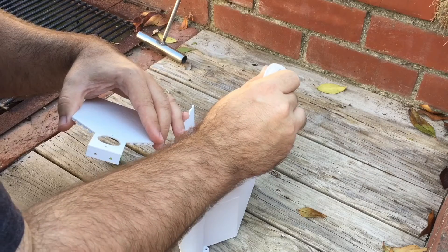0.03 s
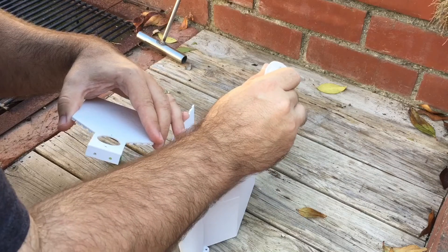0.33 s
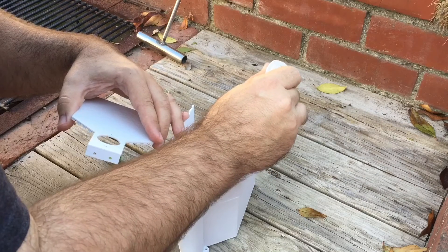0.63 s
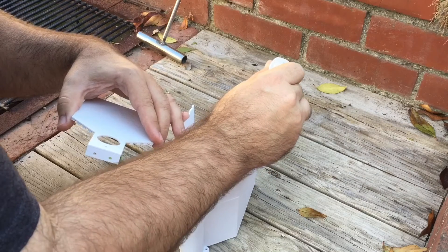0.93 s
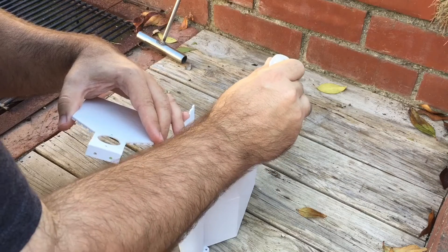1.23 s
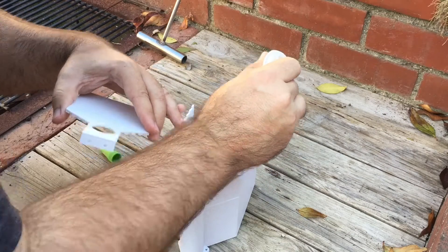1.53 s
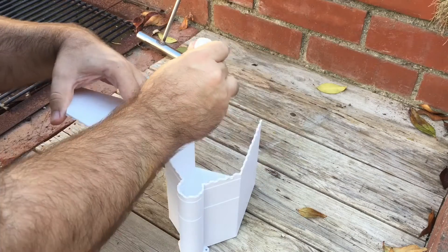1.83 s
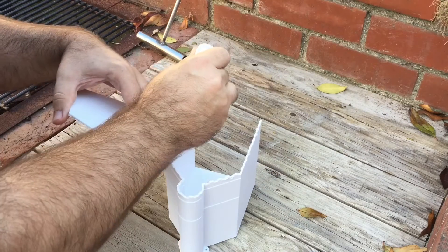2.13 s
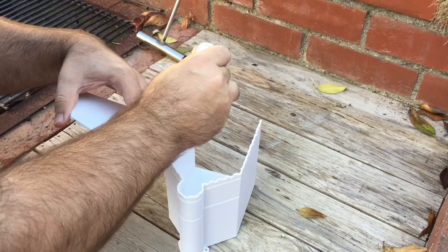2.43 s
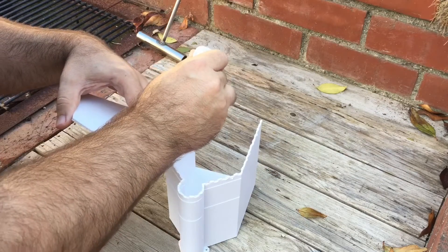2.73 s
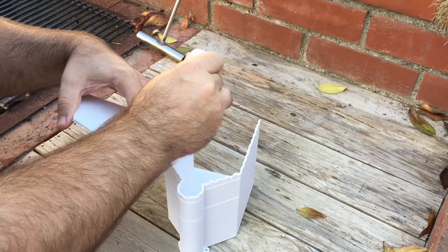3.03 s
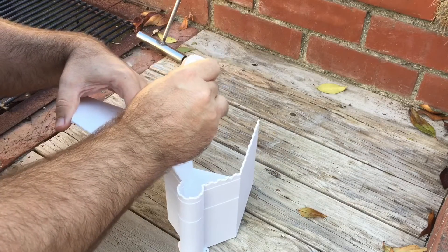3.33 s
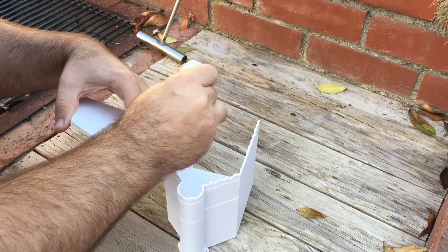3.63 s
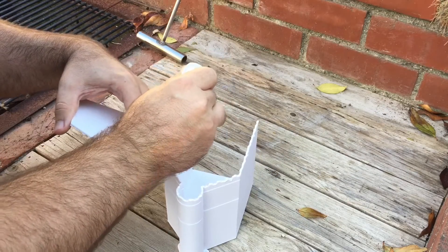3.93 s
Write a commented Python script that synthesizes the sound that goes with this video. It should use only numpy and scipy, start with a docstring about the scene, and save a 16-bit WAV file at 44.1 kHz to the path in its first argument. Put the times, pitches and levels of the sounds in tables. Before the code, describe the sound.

Plastic parts are screwed together by hand, close up, giving short hollow ticks. Then the shell knocks lightly on a wooden deck with low thuds and gritty rubbing. Outdoors, a machine hums and hisses steadily behind.

```python
"""Hands screw a plastic feeder together on a wooden deck outdoors. For a second and a half the tight
joint slips in short, hollow ticks, and the base rocks back between twists. Fingers swish over the
plastic; then, from about two seconds, the shell is shifted and knocks on the boards, with low thuds,
small edge clicks and light, gritty rubbing in between. Behind it all a machine, probably an air
conditioner, hums and hisses to the end."""
import sys
import numpy as np
from scipy import signal
from scipy.fft import rfft, irfft, next_fast_len
from scipy.io import wavfile
from scipy.ndimage import uniform_filter1d, map_coordinates

SR = 44100
rng = np.random.default_rng(int(sys.argv[2]) if len(sys.argv) > 2 else 0)


def log_audio(samples):
    """Write samples as a 16-bit WAV file to the path given in sys.argv[1]."""
    # one column per channel
    frames = np.atleast_2d(samples).T
    # limit to full scale, then quantise
    limited = np.clip(frames, -1, 1)
    pcm = np.round(limited * 32767).astype(np.int16)
    wavfile.write(sys.argv[1], SR, pcm)


N = 176400
T = np.arange(N) / SR
AGE = np.arange(SR // 4) / SR  # seconds into one hit
TOP_HZ = 15700
THUMP_ATTACK_S, SNAP_ATTACK_S = 0.0017, 0.0011

# Hollow body of the joint: pitch_ratio, gain_db, t60_s
JOINT_MODES = [(.38,-13,0.039),(.59,-36,0.058),(.86,-8.5,0.042),(1,10,0.021),(1.15,-5,0.017),(1.4,-19,0.038),(1.9,-38,0.043)]
# Woody thump of the boards, under slips and knocks: pitch_hz, gain_db, t60_s
BOARD_MODES = [(170,-6.5,0.085),(216.3,-1,0.16),(283.6,-6,0.3),(354.3,0,0.057),(400.2,-1.5,0.062),(517,-6.5,0.096),(652.4,-11,0.066),(767,-11.5,0.067),(855,-4,0.014)]
# Slip cues, before each layer's trim: start_s, tick_db, pitch_hz, thump_db, snap_db
SLIP_CUES = [(0.1681, -26, 1284, -34, -58), (0.249, -39, 1278, -55, -58), (0.2631, -25.5, 1316, -34.5, -59),
             (0.272, -39, 1180, -47, -68), (0.31, -48.5, 1270, -64, -72), (0.454, -42, 1230, -70, -77),
             (0.566, -22, 1302, -30.5, -54.5), (0.6679, -30.5, 1260, -44, -80),
             (0.8157, -29, 1274, -42.5, -60), (0.9362, -36.5, 1280, -39, -61),
             (0.9586, -43, 1300, -53, -70), (0.9909, -39, 1260, -52, -79), (1.1977, -29, 1300, -40.5, -52),
             (1.284, -29, 1302, -40, -59), (1.394, -21, 1326, -36, -45.5), (1.407, -30, 1340, -35, -51),
             (1.4745, -25.5, 1287, -37.5, -49)]
def slips(muffle_hz=3600):
    """The tight joint lets go in hollow ticks that nudge the boards; being enclosed muffles its snap."""
    out = np.zeros(N)
    for start_s, tick_db, pitch_hz, thump_db, snap_db in SLIP_CUES:
        tick = amp(tick_db + 2.5) * ring(JOINT_MODES, attack_s=0.0027, pitch=pitch_hz, sag=0.08)
        thump = amp(thump_db + 2) * ring(BOARD_MODES, THUMP_ATTACK_S)
        snap = amp(snap_db + 10.5) * filtered(wall_snap(), lambda hz: 1 / (1 + 1j * hz / muffle_hz))
        add(out, start_s, tick + thump + snap)
    return out


# Clack of the shell around its main ring: pitch_hz, gain_db, t60_s
SHELL_MODES = [(850,-10,0.028),(1120,-10,0.05),(1493,10.5,0.023),(1730,0.5,0.0079),(2250,-11.5,0.061),(2282,-20,0.042),(3540,-37,0.021),(3760,-27,0.1),(5020,-47,0.029)]
# Knock cues, before each layer's trim: start_s, clack_db, pitch_hz, ring_db, thump_db, snap_db
KNOCK_CUES = [(1.944, -23.5, 1256, -39, -37.5, -47.5), (1.964, -48, 1146, -42.5, -44, -57),
              (2.0176, -39, 1290, -46.5, -39, -63), (2.0489, -47, 1240, -50, -59, -64),
              (2.117, -55, 1247, -46, -51, -67), (2.3107, -31, 1350, -46.5, -42.5, -69),
              (2.3922, -32, 1306, -50, -39, -51.5), (2.4364, -50, 1162, -44.5, -70, -57),
              (2.5703, -33, 1310, -46, -40, -55.5), (2.6113, -51, 1073, -40, -37.5, -57),
              (2.6204, -50, 1249, -32, -33, -61), (2.7601, -50, 1035, -61, -35.5, -62),
              (2.7691, -55, 1290, -43.5, -44, -70), (2.8114, -38, 1198, -37.5, -37, -56),
              (2.8364, -55, 1148, -38.5, -39.5, -56.5), (2.9279, -52, 1240, -48, -44.5, -57),
              (3.0212, -44, 1284, -48.5, -44, -72), (3.1517, -49, 1133, -42.5, -51, -64),
              (3.1914, -45, 1205, -39.5, -37.5, -61), (3.2213, -42, 1130, -42.5, -44, -69),
              (3.3227, -41.5, 1195, -45.5, -45.5, -55), (3.4035, -54, 1206, -43.5, -54, -57),
              (3.416, -38, 1164, -39, -33, -50), (3.4643, -48, 1160, -39, -42.5, -53),
              (3.4756, -21, 1180, -32, -35, -55), (3.4794, -43, 1210, -26.5, -40, -45),
              (3.5158, -39, 1254, -32.5, -33, -46), (3.5564, -30.5, 1274, -41, -38, -48),
              (3.561, -38, 1190, -36, -66, -74), (3.644, -47, 1193, -49, -34, -58),
              (3.6893, -46, 1164, -35.5, -39, -51.5), (3.717, -52, 1200, -44, -50, -53.5),
              (3.7307, -51, 1191, -31, -33, -46), (3.8368, -54, 1163, -46.5, -45, -66),
              (3.8498, -45, 1100, -45, -34.5, -62), (3.8588, -43, 1240, -37, -36, -66),
              (3.8824, -47, 1140, -39.5, -59, -68), (3.9208, -53, 1120, -53, -45, -67),
              (3.9813, -35.5, 1181, -31, -41, -55)]
def knocks(ring_t60_s=0.056):
    """The shell bumps the deck: a clack, a main ring whose pitch shifts with the grip, thump and snap."""
    out = np.zeros(N)
    for start_s, clack_db, pitch_hz, ring_db, thump_db, snap_db in KNOCK_CUES:
        clack = amp(clack_db - 1.5) * ring(SHELL_MODES, attack_s=0.0017)
        main_ring = amp(ring_db + 3.5) * ring([(pitch_hz, 0, ring_t60_s)], attack_s=0.0016)
        thump = amp(thump_db + 8) * ring(BOARD_MODES, THUMP_ATTACK_S)
        snap = amp(snap_db + 6) * wall_snap()
        add(out, start_s, clack + main_ring + thump + snap)
    return out


# High ring of the thin walls: pitch_hz, gain_db, t60_s
WALL_MODES = [(2160,1,0.035),(2460,10.5,0.025),(2790,-19,0.034),(3310,-2,0.022),(3520,5,0.021),(4110,-1,0.053),(4860,-4.5,0.045),(5850,-9,.03),(6810,-5.5,0.015),(7210,-5,0.025),(8700,-21,0.026)]
# Bright first instant of a contact: freq_hz, gain_db
BITE_EQ = [(800,-13),(2300,-16),(3700,8),(6000,1),(8000,-3),(12000,-18),(15500,-27)]
# Noisy tail of a contact: freq_hz, gain_db
PUFF_EQ = [(300,-11),(1000,28.5),(2400,9),(4200,-23),(5500,-20),(7800,-16),(11000,-19),(15500,-49)]
def wall_snap(grip_detune=0.025):
    """A hard contact bites, then the thin walls, detuned by the grip, ring under a puff of noise."""
    walls = amp(2.5) * ring(WALL_MODES, SNAP_ATTACK_S, pitch=1 + grip_detune * rng.normal())
    bite = amp(-3.5) * noise_burst(BITE_EQ, t60_s=0.0039)
    puff = amp(-1.5) * noise_burst(PUFF_EQ, t60_s=0.084)
    return bite + walls + puff


# Dull body of the base: pitch_hz, gain_db, t60_s
BASE_MODES = [(275,-1,0.051),(404,-2,0.064),(505,-7,0.076),(660,-17,0.023),(780,-5,0.036),(930,-6,0.022),(1020,-8,0.025),(1270,-12,0.05),(1840,-17,.015)]
# Clunk cues: start_s, level_db
CLUNK_CUES = [(0.2, -28.5), (0.501, -33), (0.877, -42), (1.222, -32), (1.424, -29)]
def clunks(trim_db=-2.5, loss_db=3, gap_s=0.00398):
    """Between twists the feeder rocks back and settles on its base in three quick, fading contacts."""
    out = np.zeros(N)
    for start_s, level_db in CLUNK_CUES:
        for contact in range(3):
            gain = amp(level_db + trim_db - contact * loss_db)
            add(out, start_s, gain * ring(BASE_MODES, attack_s=0.0012))
            start_s += gap_s * rng.uniform(0.5, 2.01)
    return out


# Low boom of the deck: pitch_hz, gain_db, t60_s
DECK_MODES = [(236, 1, 0.14), (283, 0, 0.13)]
# Thud cues: start_s, level_db
THUD_CUES = [(1.424, -29.5), (2.612, -33), (2.93, -35), (3.417, -25), (3.513, -29), (3.641, -26),
             (3.744, -23.5), (3.858, -40), (3.877, -25), (3.979, -30)]
def thuds(trim_db=-3.5):
    """The deck booms softly when the feeder is pressed down on it."""
    out = np.zeros(N)
    for start_s, level_db in THUD_CUES:
        add(out, start_s, amp(level_db + trim_db) * ring(DECK_MODES, attack_s=0.0036))
    return out


# Thin ping of the plastic edges: pitch_hz, gain_db, t60_s
EDGE_MODES = [(7500,-2,0.021),(8260,2,.05),(9000,0,.025),(10360,-4,.04),(12000,-8,.04)]
# Crisp noise of one catch: freq_hz, gain_db
CLICK_EQ = [(1500,-14),(4000,-9),(6000,-13),(8000,5),(9700,7),(12000,2),(13200,-11),(15500,-32)]
# Click cues: start_s, level_db
CLICK_CUES = [(2.4339, -57), (2.9243, -60), (3.4115, -52.5), (3.4645, -63), (3.476, -54), (3.5145, -66),
              (3.541, -57), (3.7275, -46)]
def edge_clicks(trim_db=3, loss_db=6, gap_s=0.002):
    """Thin edges scrape past each other in four quick, weakening catches."""
    out = np.zeros(N)
    for start_s, level_db in CLICK_CUES:
        for catch in range(4):
            click = (noise_burst(CLICK_EQ, t60_s=0.018) + ring(EDGE_MODES, SNAP_ATTACK_S)) / 2
            add(out, start_s, amp(level_db + trim_db - catch * loss_db) * click)
            start_s += gap_s * rng.uniform(0.41, 2)
    return out


# Fader ride of the sliding hands and plastic, for rubbing and grit: time_s, level_db
SLIDE_RIDE = [(0,-55.5),(1.1,-63),(1.45,-48.5),(1.75,-59.5),(2.05,-59),(2.25,-60),(2.8,-55.5),(3.05,-55),(3.2,-50.5),(3.35,-61),(3.5,-47),(3.62,-56.5),(3.85,-57),(4,-51)]
# Colour that shell and boards give the rubbing: freq_hz, gain_db
RUB_EQ = [(120,-36),(270,11),(450,3.5),(950,-8.5),(1190,3.5),(1380,-3),(1520,-26),(1900,-25),(2400,-23),(3000,-22.5),(6000,-38),(12000,-44),(15500,-58)]
def rubbing(scuff_rise_s=0.0036, scuff_fall_s=0.02):
    """Tiny random slips blur into a soft rub that swells to a scuff around each knock."""
    grains = impulses(per_s=700) * np.exp(0.35 * rng.standard_normal(N))
    ride = amp(np.interp(T, *np.transpose(SLIDE_RIDE)))
    scuffs = np.zeros(N)
    for start_s, _, _, _, thump_db, _ in KNOCK_CUES:
        falloff = np.maximum((start_s - T) / scuff_rise_s, (T - start_s) / scuff_fall_s)
        scuffs += amp(thump_db - 8) * np.exp(-falloff.clip(0, 20))
    return coloured(grains, RUB_EQ) * (ride + scuffs)


# Crackle of grit between the parts: freq_hz, gain_db
GRIT_EQ = [(600,-21),(1150,5),(1600,6),(2400,3.5),(3100,-4),(3650,1),(5000,-10.5),(7500,-16),(13000,-38)]
def grit(crunch_s=0.0078):
    """Sparse, sharp grains crackle while the parts slide, most of all around a hard knock."""
    grains = impulses(per_s=240) * np.exp(0.5 * rng.standard_normal(N).clip(-2, 2))
    ride = amp(np.interp(T, *np.transpose(SLIDE_RIDE)) - 11)
    crunches = sum(amp(snap_db - 6) * np.exp(-((T - start_s) / crunch_s) ** 2)
                   for start_s, *_, snap_db in KNOCK_CUES)
    return coloured(grains, GRIT_EQ) * (ride + crunches)


# Finger swish cues: peak_s, length_s, centre_hz, level_db
SCRATCH_CUES = [(1.043,0.02,4100,-59.5),(1.303,0.019,2120,-52.5),(1.63,0.062,5300,-72),(1.68,0.11,4150,-64),(1.73,0.22,8700,-75),(1.75,.14,13800,-80),(2.07,0.026,5460,-67),(2.315,0.018,10300,-74),(2.493,0.017,5870,-67),(2.64,0.055,3080,-67),(2.937,0.024,6400,-68),(2.96,0.045,3120,-61.5),(3.094,0.022,3040,-59.5),(3.137,0.028,10200,-67.5),(3.42,0.022,9300,-69),(3.52,.025,7900,-69),(3.726,.018,11700,-64)]
def scratches(flutter_db=2.5):
    """Fingers slide briefly over the plastic with a thin, uneven swish."""
    out = np.zeros(N)
    for peak_s, length_s, centre_hz, level_db in SCRATCH_CUES:
        gain = amp(level_db + flutter_db * wobble(per_s=150))
        swell = np.exp(-2 * ((T - peak_s) / length_s) ** 2)
        out += gain * swell * noise_band(centre_hz, width_hz=0.11 * centre_hz)
    return out


# Motor tones: pitch_hz, level_db, waver_db
HUM_TONES = [(105.76,-41,1.27),(238.7,-43.5,-1.15),(361,-61,2.5),(489,-68,3)]
def machine_hum(drift_rad=0.055, throb_hz=2.563, throb_depth=0.095, throb_peak_s=0.2):
    """Motor tones waver slightly; a close tone, perhaps another fan, beats against the lowest."""
    tones = []
    for pitch_hz, level_db, waver_db in HUM_TONES:
        gain = np.sqrt(2) * amp(level_db + waver_db * wobble(per_s=7.27))
        phase = 2 * np.pi * pitch_hz * T + drift_rad * wobble(per_s=4)
        tones.append(gain * np.exp(1j * phase))
    close_tone = throb_depth * tones[0] * np.exp(2j * np.pi * throb_hz * (T - throb_peak_s))
    return (sum(tones) + close_tone).imag


# Low end of the moving air: freq_hz, gain_db
RUMBLE_EQ = [(25,-30),(45,-22.5),(70,-8),(100,1.5),(140,6.5),(190,1.5),(228,9),(255,8),(285,1.5),(315,-3.5),(380,-4.5),(460,-6.5),(520,-6),(680,-18.5),(1000,-33),(2000,-99)]
# Mids and top of the moving air: freq_hz, gain_db
HISS_EQ = [(530, -71), (900, -5), (1010, -26), (1210, -0.5), (1520, 0), (1930, 1), (3070, -12), (3710, -14),
           (4230, -14.5), (4990, -16.5), (7490, -22), (8230, -20.5), (9730, -23.5), (10600, -19.5),
           (15500, -27.5)]
# Narrow resonances in the hiss: centre_hz, width_hz, level_db
WHISTLE_BANDS = [(1920,180,-67),(3940,51,-75),(4280,190,-69),(4266,22,-75),(8160,270,-81),(10320,180,-83.5)]
def machine_air(rumble_db=-46, hiss_db=-58, flutter_db=2.6):
    """Air moving through the machine lays a bed of rumble, hiss and faint, fluttering whistles."""
    rumble = amp(rumble_db + 0.19 * wobble(per_s=6.08)) * coloured(rng.standard_normal(N), RUMBLE_EQ)
    hiss = amp(hiss_db + 0.34 * wobble(per_s=4.6)) * coloured(patchy_noise(), HISS_EQ)
    whistles = sum(amp(level_db + flutter_db * wobble(per_s=14)) * noise_band(centre_hz, width_hz)
                   for centre_hz, width_hz, level_db in WHISTLE_BANDS)
    return rumble + hiss + whistles


def ring(modes, attack_s, pitch=1, sag=0, settle_s=0.003, scatter_db=3.5):
    """Struck modes, balanced anew each hit, at peak 1; they start sharp by the share sag and settle."""
    clock = AGE + sag * settle_s * (1 - np.exp(-AGE / settle_s))
    body = np.zeros(len(AGE))
    for k, (freq, gain_db, t60_s) in enumerate(modes):
        gain = (-1) ** k * amp(gain_db + scatter_db * rng.normal())
        body += gain * envelope(attack_s, t60_s) * np.sin(2 * np.pi * freq * pitch * clock)
    return body / np.abs(body).max()


def noise_burst(eq, t60_s, scatter_db=4):
    """The brief noise of a contact, tinted a little differently each time."""
    grid_hz = np.linspace(0, TOP_HZ, num=36)
    tint_db = scatter_db * rng.standard_normal(len(grid_hz))
    noise = filtered(rng.standard_normal(len(AGE)), lambda hz: amp(np.interp(hz, grid_hz, tint_db)))
    return coloured(noise, eq) * envelope(SNAP_ATTACK_S, t60_s)


def envelope(attack_s, t60_s):
    """A soft attack and an exponential tail."""
    return (1 - np.exp(-AGE / attack_s)) * np.exp(-np.log(1000) * AGE / t60_s)


def impulses(per_s):
    """Randomly timed spikes of either sign."""
    return (rng.random(N) < per_s / SR) * np.sign(rng.standard_normal(N))


def noise_band(centre_hz, width_hz):
    """Noise around one frequency, at rms 1."""
    noise = rng.standard_normal(N)
    return unit(filtered(noise, lambda hz: 1 / (1 + 2 * ((hz - centre_hz) / width_hz) ** 2)))


def patchy_noise(depth_db=1):
    """White noise with soft patches of gain in time and frequency."""
    spectrum = signal.stft(rng.standard_normal(N), nperseg=512)[2]
    patches = uniform_filter1d(rng.standard_normal(spectrum.shape), size=5, axis=0)
    patches = uniform_filter1d(patches, size=16, axis=1)
    return signal.istft(spectrum * amp(depth_db * unit(patches)), nperseg=512)[1][:N]


def wobble(per_s):
    """A smooth random curve with per_s knots a second."""
    return map_coordinates(rng.standard_normal(int(N * per_s / SR) + 4), [T * per_s])


def coloured(x, eq):
    """x through an EQ curve of (freq_hz, gain_db) points, at rms 1."""
    freq_hz, gain_db = np.transpose(eq)
    return unit(filtered(x, lambda hz: amp(np.interp(np.log(hz + 1), np.log(freq_hz + 1), gain_db))))


def filtered(x, response):
    """x through a frequency response."""
    size = next_fast_len(len(x) + SR // 2)
    return irfft(rfft(x, size) * response(np.fft.rfftfreq(size, 1 / SR)), size)[:len(x)]


def add(track, start_s, sound, lead_s=0.000989):
    """Mix a hit in just ahead of its cue: contact begins before the ring builds up."""
    i = max(round((start_s - lead_s) * SR), 0)
    track[i:i + len(sound)] += sound[:max(N - i, 0)]


def amp(db):
    """Decibels to gain."""
    return 10 ** (np.asarray(db) / 20)


def unit(x):
    """Scale to rms 1."""
    return x / np.sqrt(np.mean(x ** 2) + 1e-20)


def scene():
    """A mono mix: handling up close, the machine behind it."""
    hits = slips() + clunks() + knocks() + thuds() + edge_clicks()
    friction = rubbing() + grit() + scratches()
    return (hits + friction + machine_hum() + machine_air())[None]


def record(dry):
    """A brick-wall high cut at TOP_HZ."""
    return np.array([filtered(x, lambda hz: hz < TOP_HZ) for x in dry])


dry = scene()
out = record(dry)
log_audio(out)
```